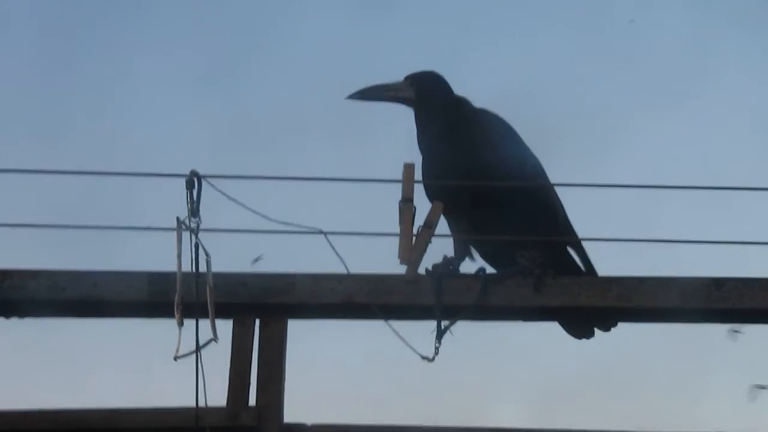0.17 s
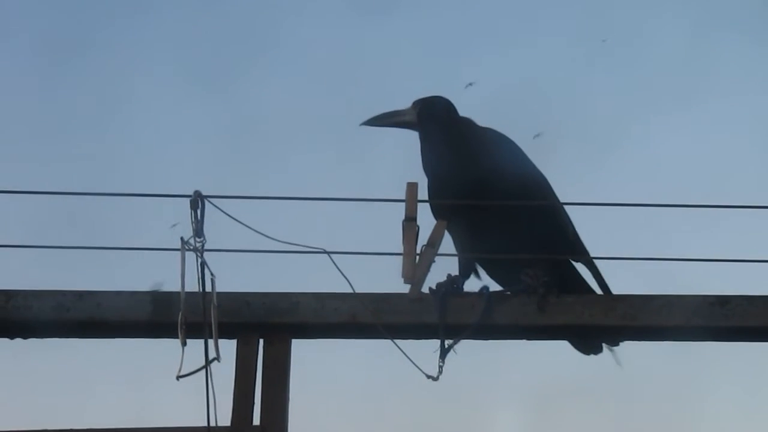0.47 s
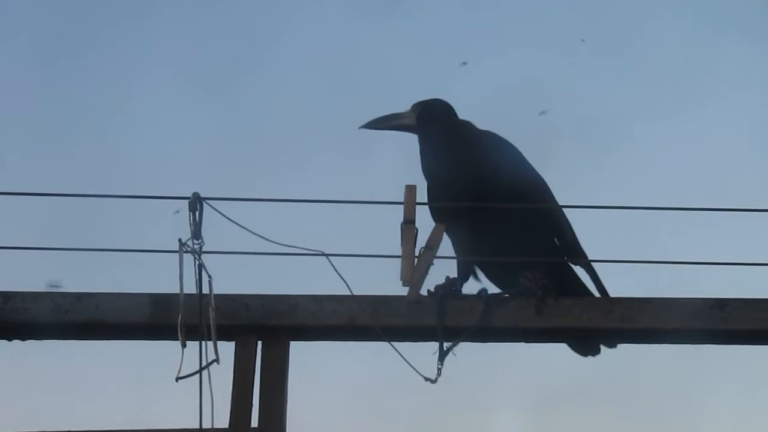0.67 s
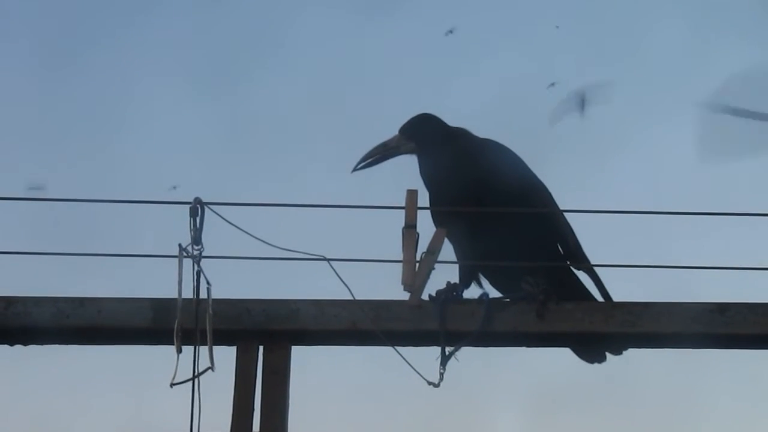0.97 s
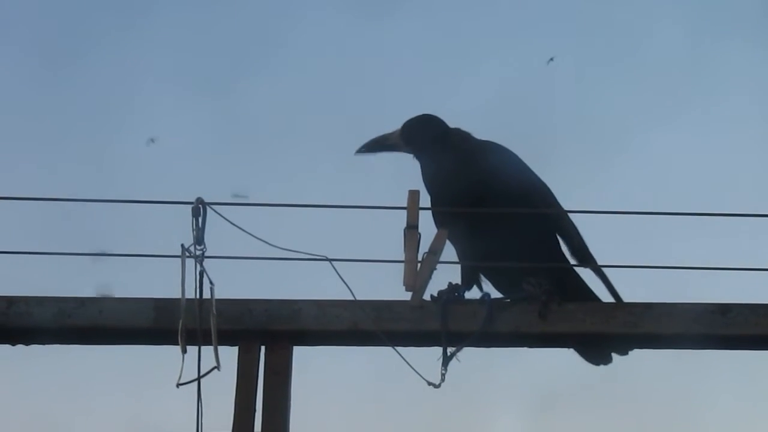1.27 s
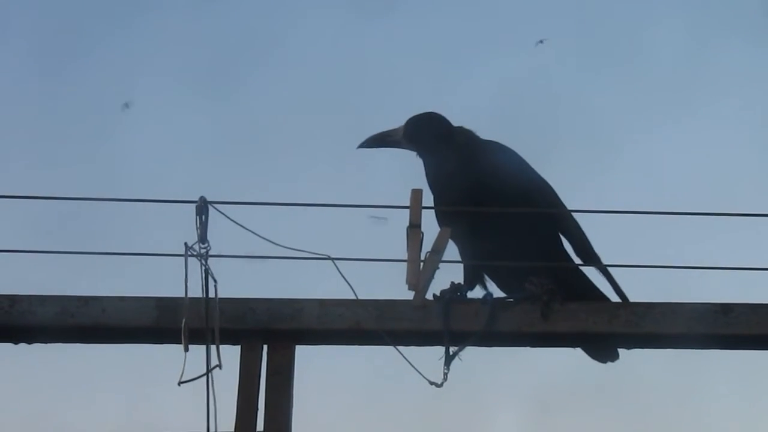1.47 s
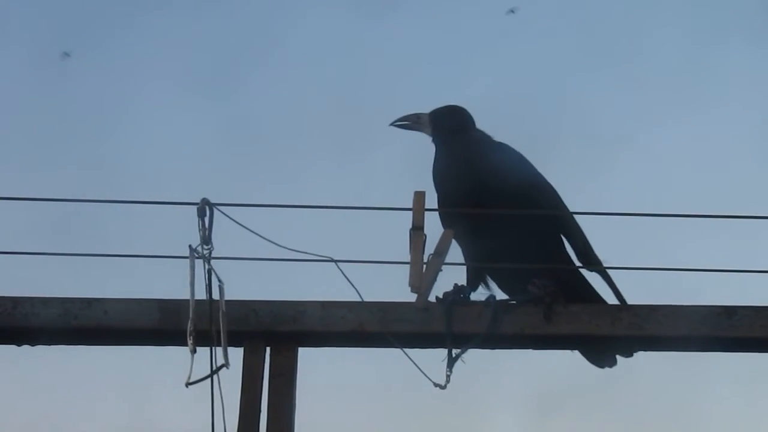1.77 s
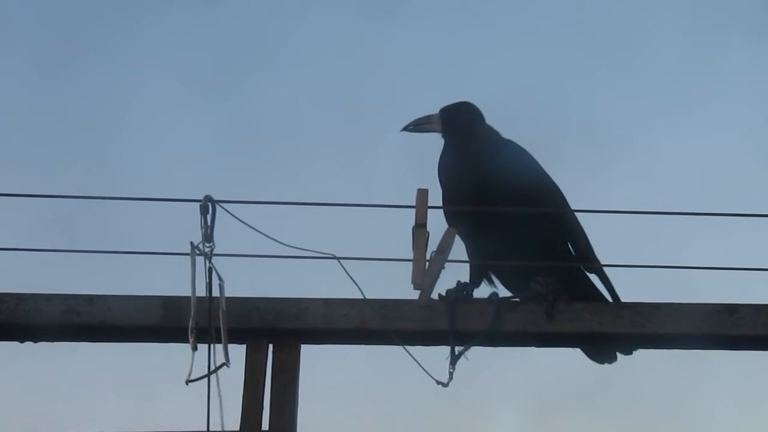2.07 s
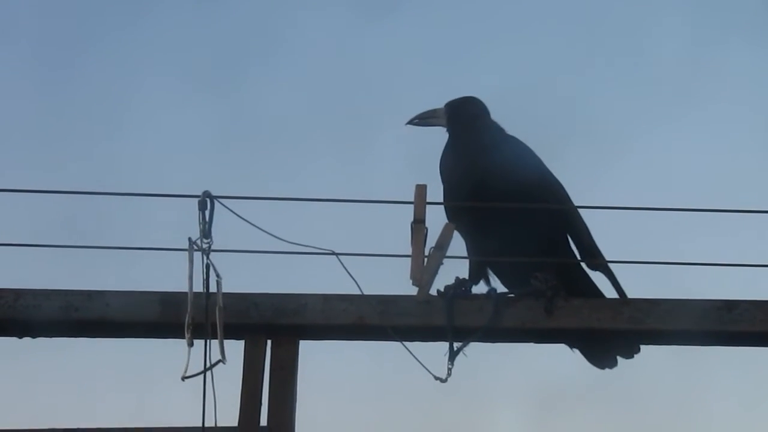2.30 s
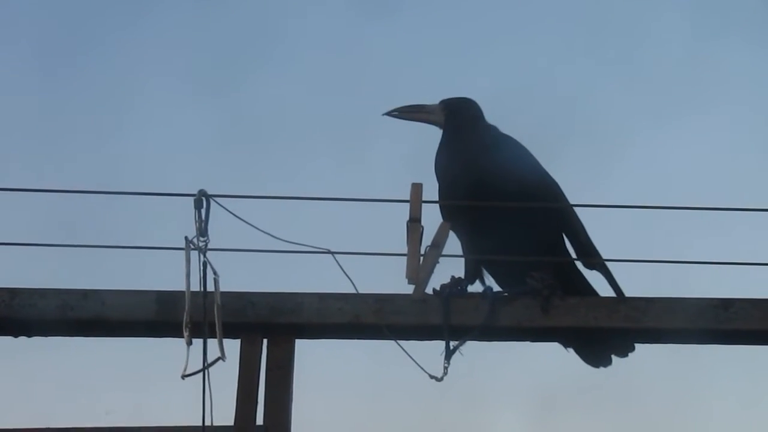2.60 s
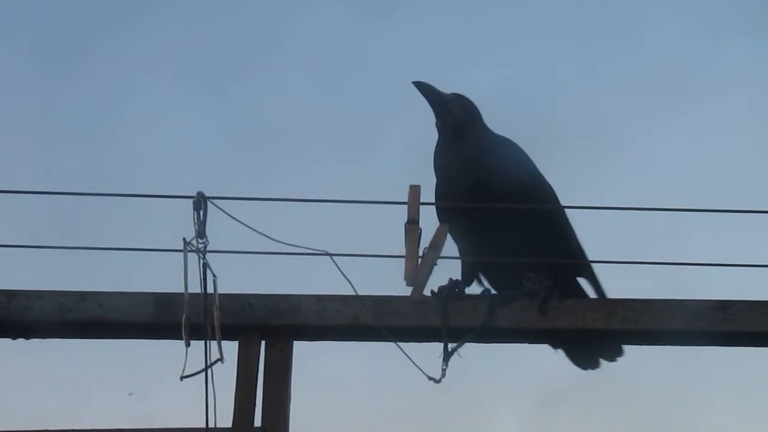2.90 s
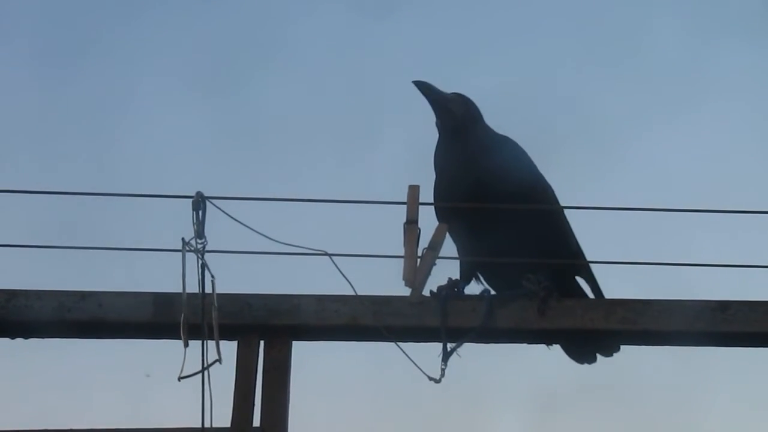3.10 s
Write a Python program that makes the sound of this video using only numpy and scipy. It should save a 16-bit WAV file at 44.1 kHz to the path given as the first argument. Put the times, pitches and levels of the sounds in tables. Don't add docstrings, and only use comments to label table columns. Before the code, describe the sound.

Swifts scream in shrill, fluttering whistles past a balcony while wind buffets the microphone over distant town rumble.

```python
import sys
import numpy as np
from scipy import signal
from scipy.io import wavfile
from scipy.ndimage import uniform_filter1d

SR = 44100
rng = np.random.default_rng(int(sys.argv[2]) if len(sys.argv) > 2 else 0)


def waveform_to_disk(signal):
    frames = np.transpose(np.atleast_2d(signal))
    scaled = np.clip(frames, -1, 1) * 32767
    samples = np.round(scaled).astype(np.int16)
    wavfile.write(sys.argv[1], SR, samples)


def how_loud(loudness_db):
    steps = np.asarray(loudness_db, float) / 20
    return 10 ** steps


N = 143325

# pitch_hz, level_db (per Hz)
TOWN_SPECTRUM = [(15, -14), (25, 1.5), (91, -7.5), (584, -19), (1120, -19.5), (3460, -31), (5460, -36),
                 (9880, -47), (15600, -58)]
# pitch_hz, width_hz, level_db
HUMS = [
    (1004, 142, -55),
    (1672, 390, -56.5),
]
# time_s, level_db
GUST = [(0, -33), (.35, -32.5), (.62, -39.5), (.68, -25.5), (.95, -26.5), (1, -30), (1.13, -30.5),
        (1.25, -20), (1.48, -26), (1.73, -26.5), (1.8, -37.5), (1.95, -31), (2.1, -23), (2.35, -31.5),
        (2.55, -26.5), (2.64, -31.5), (2.87, -28), (3.16, -34)]
# pitch_hz, level_db (per Hz)
BLOW_SPECTRUM = [(15, -38), (25, -19), (64, 4.5), (190, -4.5), (314, -12.5), (998, -43.5), (1690, -67),
                 (2860, -120)]
# start_s, level_db
BUFFETS = [(0.315, -11), (0.365, -16.5), (0.488, -19), (0.655, -14), (0.675, -11.5), (0.701, -10.5),
           (0.745, -11.5), (0.814, -13), (0.872, -8.5), (0.942, -15.5), (1.137, -12), (1.173, -9.5),
           (1.203, -9), (1.238, -6.5), (1.267, -8), (1.318, -18), (1.379, -7), (1.408, -8.5), (1.586, -11),
           (1.708, -17.5), (1.967, -12), (2.022, -8), (2.068, -15), (2.104, -12), (2.149, -14),
           (2.198, -13.5), (2.264, -10.5), (2.323, -16), (2.405, -14), (2.495, -13), (2.518, -7.5),
           (2.545, -6.5), (2.571, -11), (2.669, -10.5), (2.725, -25), (2.79, -14), (2.812, -11),
           (2.829, -14), (2.854, -14.5), (2.915, -25), (2.958, -14), (3.043, -16.5), (3.175, -23),
           (3.231, -15)]
# time_s, level_db, shrillness_db
FLOCK = [(0, -61.5, -1), (.28, -61, -3), (.4, -54.5, -2), (.56, -58, -5), (.7, -58, -6), (1, -65, 6),
         (1.12, -63, 17.5), (1.24, -52, 7), (1.36, -50, -12), (1.5, -57, -7), (1.65, -63, 0),
         (1.95, -55.5, -3), (2.25, -61, 0), (2.5, -49, -1), (2.7, -53.5, -6), (2.85, -62, -3),
         (3.25, -58.5, 2)]
# pitch_hz, level_db (per Hz)
HAZE_SPECTRUM = [(3000, -54), (4700, 6), (6600, 1), (9000, -4.5), (11200, -13.5), (14000, -45)]
# start_s, length_s, top_hz, level_db, octave_db
FAR = [(-.1, 0.21, 5300, -51, -26), (0.124, 0.072, 5400, -46, -23), (0.228, 0.092, 7900, -47, -30),
       (0.447, 0.29, 5850, -55, -27), (0.523, 0.14, 5120, -47, -37), (0.535, 0.024, 7600, -40, -25),
       (0.568, 0.04, 8250, -52, -30), (0.679, 0.14, 5650, -54.5, -12.5),
       (0.974, 0.15, 5600, -59, -4.5), (1.16, 0.087, 5150, -55, -12), (1.183, 0.095, 5550, -50, -17),
       (1.294, 0.1, 5750, -43.5, -32), (1.322, 0.114, 6300, -46.5, -27),
       (1.325, 0.068, 4760, -53, -30), (1.39, 0.14, 5330, -49.5, -37), (1.453, 0.22, 5500, -52, -16),
       (1.549, 0.19, 5030, -48, -27.5), (1.742, 0.12, 4800, -49.5, -24.5),
       (1.736, 0.1, 5590, -53, -15),
       (1.816, 0.21, 6830, -55.5, -28), (1.882, .12, 5500, -53, -26), (1.965, 0.21, 6180, -50, -27),
            (2.022, 0.092, 5640, -44.5, -32), (2.117, 0.057, 5240, -47, -32), (2.187, .06, 6100, -42, -32),
            (2.167, 0.045, 4100, -55, -30), (2.394, .08, 4050, -51, -34), (2.58, .04, 4770, -53, -30),
            (2.671, 0.13, 5850, -49.5, -22), (2.655, 0.134, 4970, -47.5, -23),
            (2.716, 0.053, 3970, -64, -32), (2.806, 0.095, 5020, -51, -26),
            (3.086, 0.13, 5280, -42.5, -26.5), (3.193, 0.083, 5620, -39, -26)]
# time_s, pitch_hz, level_db
NEAR = [
    [(.2, 4260, -46.5), (.225, 4750, -43.5), (.265, 5120, -38), (.3, 5240, -40), (.345, 5310, -43),
     (.4, 5400, -46.5), (.44, 5550, -46), (.5, 5660, -59)],
    [(.828, 4950, -44.5), (.865, 5630, -36), (.91, 5900, -41), (.98, 6250, -36.5), (1.08, 6560, -40),
     (1.18, 6520, -37), (1.23, 6285, -29), (1.3, 6000, -35), (1.335, 5650, -40)],
    [(2.16, 5470, -43), (2.2, 5610, -44.5), (2.25, 5630, -45.5), (2.3, 5600, -45.5), (2.34, 5540, -35),
     (2.37, 5500, -42), (2.42, 5100, -47)],
    [(2.33, 4450, -54), (2.4, 4990, -44.5), (2.45, 5200, -40), (2.5, 5350, -38), (2.57, 5520, -35.5),
     (2.6, 5610, -32), (2.63, 5780, -28.5), (2.65, 5360, -39.5), (2.71, 4920, -49)],
]
# time_s, pitch_hz, level_db
ALONGSIDE = [
    [(2.86, 5400, -42), (2.89, 5630, -47), (2.96, 5780, -51.5), (3.02, 5850, -46.5), (3.08, 5890, -48.5),
     (3.16, 5910, -41.5), (3.26, 6160, -46)],
    [(2.88, 4700, -40), (2.91, 5090, -35), (2.96, 5170, -39.5), (3.0, 5230, -42), (3.04, 5270, -42),
     (3.09, 5490, -44)],
    [(2.37, 5350, -45), (2.44, 5760, -45.5), (2.5, 5950, -45), (2.55, 6200, -46), (2.59, 6080, -50)],
    [(.32, 5840, -54), (.36, 6440, -49), (.41, 6730, -50), (.5, 6670, -58)],
]
# octave_db, flutter_hz, trill_start_s
VOICES = [
    (-18, 300, 0.61),
    (-18, 190, 1.188),
    (-19, 330, 2.5),
    (-20.5, 190, 2.8),
    (-21, 190, 4),
    (-28.5, 300, 3.2),
    (-26, 280, 4),
    (-30, 570, 4),
]
SWINGS_HZ = (170, 210, 80, 110, 230, 190, 160, 300)
# start_s, level_db
TICKS = [
    (0.5726, -48),
    (1.5938, -40),
    (1.8517, -40),
    (1.9455, -43),
    (2.0058, -46),
    (2.1794, -46),
    (2.6783, -52),
    (2.7896, -44),
]
# middle_s, half_length_s, level_db
RUSHES = [
    (2.56, 0.082, -50.5),
    (2.723, 0.14, -47),
]
# pitch_hz, level_db (per Hz)
WING_SPECTRUM = [(300, -8), (700, 2.5), (2000, -6), (4000, -11), (7000, -28)]

TOWN_DB, WHINE_HZ, WHINE_DB = -39.5, 7882, -67
BUFFET_DB, BUFFET_RISE_S, BUFFET_FALL_S = -10, 0.0041, 0.014
LUMPY_DB, BRIGHTEN, FIZZ_DB, SPLIT_HZ = 1.5, 1.9, -5, 211.4
POP_S, POP_DB, POP_BEFORE_S, POP_AFTER_S, POP_EDGE_S = 1.4546, 3.5, 0.0012, 0.0014, 0.00035
HAZE_DB, HAZE_PATCHY_DB, HAZE_GRAIN_DB, SHRILL_HZ = 3, 1.5, 1.3, 6960
SWING_GROWS_S, BEAT, JITTER, WOBBLE_HZ, UNEVEN_DB, EDGE_S = .065, .4, .03, 32, 3, .01
TRILL_PER_S, TRILL_DB, OCTAVE_FALL_DB_PER_KHZ = 36, 16, 6
RASP_DB, RASP_WIDTH_HZ = -18, 500
YARD_T60_S, NEAR_WET_DB, FAR_WET_DB, SMEAR_HZ = .28, -8, -4, 120
RISE, RISE_S, DROOP, FAR_SWING_HZ, THIN_SWING_HZ = .1, .024, .025, 240, 50
TICK_S, TICK_DB, TICK_HZ = .008, -12, 8000


def evened(x):
    return x / np.sqrt(np.mean(x ** 2) + 1e-20)


def slow(count, hz):
    b, a = signal.butter(2, min(hz, 9000) / SR * 2)
    settled = signal.lfilter(b, a, rng.standard_normal(count + 4000))[4000:]
    return evened(settled)


def add(mix, s, sound):
    at = round(s * SR)
    part = mix[max(at, 0):][:len(sound) + min(at, 0)]
    part += sound[max(-at, 0):][:len(part)]


def coloured(spectrum, patchy_db=1.):
    frames, hz = N // 256 + 5, np.fft.rfftfreq(1024, 1 / SR)[:, None]
    a, b, patches = rng.standard_normal((frames, 513, 3)).T
    patches = uniform_filter1d(patches, size=10, axis=0)
    patches = evened(uniform_filter1d(patches, size=12, axis=1))
    f, db = np.transpose(spectrum)
    shape = np.interp(np.log(hz + 1), np.log(f + 1), db)
    shape = shape - 40 * ((hz < f[0] - 15) | (hz > 1.2 * f[-1]))
    bins = (a + 1j * b) * how_loud(shape + patchy_db * patches)
    return evened(signal.istft(bins, nperseg=1024, noverlap=768)[1][:N])


def curve(table, axis=1):
    return np.interp(np.arange(N) / SR, *np.transpose(table)[[0, axis]])


def town():
    t = np.arange(N) / SR
    out = how_loud(TOWN_DB) * coloured(TOWN_SPECTRUM, patchy_db=0.5)
    for hz, width, db in HUMS:
        out = out + how_loud(db) * slow(N, width / 2) * np.cos(2 * np.pi * hz * t) * np.sqrt(2)
    whine_level = how_loud(WHINE_DB + 2.5 * slow(N, 40))
    return out + whine_level * np.sqrt(2) * np.sin(2 * np.pi * WHINE_HZ * t)


def wind():
    power = how_loud(curve(GUST) + LUMPY_DB * slow(N, 26.4)) ** 2
    t = np.arange(0, .1, 1 / SR)
    swell = 2 * (1 - np.exp(-t / BUFFET_RISE_S)) * np.exp(-t / BUFFET_FALL_S)
    for s, db in BUFFETS:
        add(power, s, (how_loud(db + BUFFET_DB) * swell) ** 2)
    strength = np.sqrt(power)
    fizz = how_loud(FIZZ_DB - 25.5) * (strength / how_loud(-24.0)) ** BRIGHTEN
    out = np.zeros(N)
    for kind, gain in (("low", strength), ("high", fizz)):
        b, a = signal.butter(2, SPLIT_HZ / SR * 2, kind)
        part = signal.lfilter(b, a, coloured(BLOW_SPECTRUM, patchy_db=0.5))
        out = out + gain * part / np.sqrt(abs(uniform_filter1d(part ** 2, size=1200)) + 1e-9)
    u = np.arange(-.01, .01, 1 / SR)
    pop = np.tanh(u / POP_EDGE_S) * np.exp(-abs(u) / np.where(u < 0, POP_BEFORE_S, POP_AFTER_S))
    add(out, POP_S + u[0], -how_loud(POP_DB) * pop)
    return signal.lfilter(*signal.butter(2, 1200 / SR * 2), out)


def haze_level():
    return how_loud(curve(FLOCK) + HAZE_DB + HAZE_GRAIN_DB * slow(N, 70))


def haze():
    all_ways = haze_level() * coloured(HAZE_SPECTRUM, HAZE_PATCHY_DB)
    noise = coloured(HAZE_SPECTRUM, HAZE_PATCHY_DB)
    low, high = (signal.sosfiltfilt(signal.butter(2, SHRILL_HZ / SR * 2, kind, output="sos"), noise)
                 for kind in ("low", "high"))
    return all_ways + haze_level() * (low + how_loud(curve(FLOCK, axis=2)) * high)


def whistle(t, hz, db, swing_hz, octave_db, flutter_hz, trill_s):
    n = len(t)
    trilling = t > trill_s
    flutter = 2 * np.pi * np.cumsum(flutter_hz * (1 + JITTER * slow(n, 32.0))) / SR
    grown = (1 - np.exp(-((t - t[0]) / SWING_GROWS_S) ** 2)) * np.where(trilling, .65, 1)
    swing = grown * np.cos(flutter)
    phase = 2 * np.pi * np.cumsum(hz + swing_hz * swing + WOBBLE_HZ * slow(n, 150)) / SR
    trill = -TRILL_DB * trilling * np.sin(np.pi * TRILL_PER_S * (t - trill_s)) ** 2
    edge = np.clip(np.minimum(t - t[0], t[-1] - t) / EDGE_S, 0, 1)
    octave_db = octave_db + (db - np.max(db)) / 4 + 4.7 * trilling + 2 * slow(n, 6.7)
    octave = how_loud(octave_db - OCTAVE_FALL_DB_PER_KHZ * (2 * hz / 1000 - 11.5))
    rasp = 1 + how_loud(RASP_DB) * slow(n, RASP_WIDTH_HZ)
    tone = np.cos(phase) * rasp + octave * np.cos(2 * phase)
    level = how_loud(db + trill + UNEVEN_DB * slow(n, 66))
    return np.sqrt(2) * edge * level * (1 + BEAT * swing) * tone


def yard(x, wet_db):
    taps = np.zeros(SR // 2)
    at = np.arange(400, len(taps) - 20, 20)
    taps[at + rng.integers(0, 20, len(at))] = rng.choice([-1., 1.], len(at))
    taps *= how_loud(-60 * np.arange(len(taps)) / SR / YARD_T60_S)
    echoes = signal.fftconvolve(x * slow(N, SMEAR_HZ), taps / np.linalg.norm(taps))[:N]
    return x + how_loud(wet_db) * echoes


def far_swifts():
    out = np.zeros(N)
    for start, length, top_hz, db, octave_db in FAR:
        t = np.arange(0, length, 1 / SR)
        swing_hz = THIN_SWING_HZ if octave_db > -12 else FAR_SWING_HZ
        rise = RISE * min(length / 0.29, 1) * np.exp(-t / RISE_S)
        hz = top_hz * (1 - rise - DROOP * (t / length) ** 3)
        flutter_hz = rng.uniform(230, 330)
        add(out, start, whistle(t, hz, db, swing_hz, octave_db, flutter_hz, .5 * length - .04))
    return yard(out, FAR_WET_DB)


def near_swifts():
    out = np.zeros(N)
    for rows, swing_hz, voice in zip(NEAR + ALONGSIDE, SWINGS_HZ, VOICES):
        s, hz, db = np.transpose(rows)
        t = np.arange(s[0], s[-1], 1 / SR)
        glide = uniform_filter1d(np.interp(t, s, hz), size=600, mode="nearest")
        add(out, s[0], whistle(t, glide, np.interp(t, s, db), swing_hz, *voice))
    return yard(out, NEAR_WET_DB)


def ticks():
    out, t = np.zeros(N), np.arange(0, .03, 1 / SR)
    for s, db in TICKS:
        add(out, s, how_loud(db + TICK_DB) * np.exp(-t / TICK_S) * rng.standard_normal(len(t)))
    return signal.lfilter(*signal.butter(3, TICK_HZ / SR * 2, "high"), out)


def wings():
    t = np.arange(N) / SR
    passes = sum(how_loud(db) * np.exp(-((t - s) / half) ** 2) for s, half, db in RUSHES)
    return passes * coloured(WING_SPECTRUM, patchy_db=3.0)


def scene():
    mix = town() + wind() + haze() + far_swifts() + near_swifts() + ticks() + wings()
    return mix[None]


def roll_off(x):
    return signal.sosfilt(signal.butter(12, 15770, fs=SR, output="sos"), x)


def record(dry):
    power_db = 10 * np.log10(abs(uniform_filter1d((dry ** 2).mean(0), size=1500)) + 1e-12)
    fall = np.arange(N) * 11.8 / SR
    held_db = np.maximum.accumulate(power_db + fall) - fall
    over_db = np.maximum(held_db + 22, 0)
    mix = dry / how_loud(0.32 * uniform_filter1d(over_db, size=400))
    return roll_off(mix)


dry = scene()
out = record(dry)
waveform_to_disk(out)
```